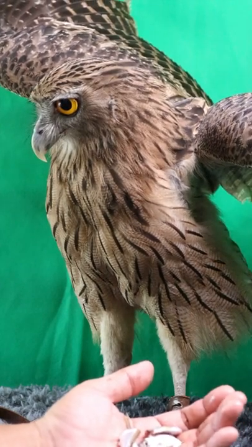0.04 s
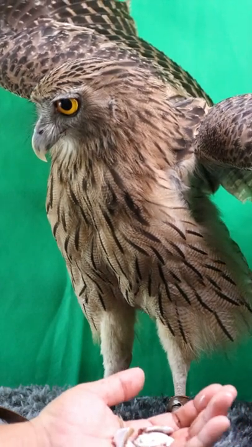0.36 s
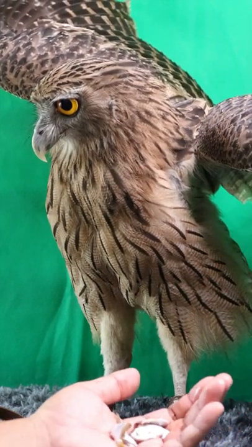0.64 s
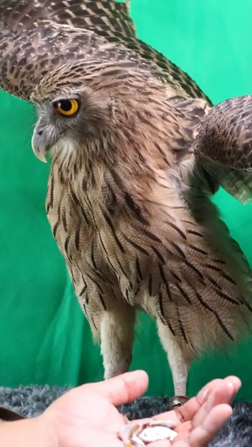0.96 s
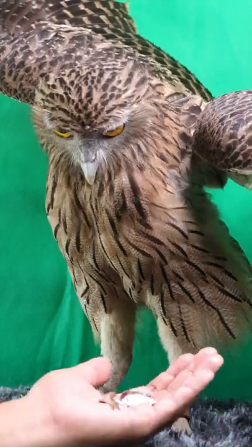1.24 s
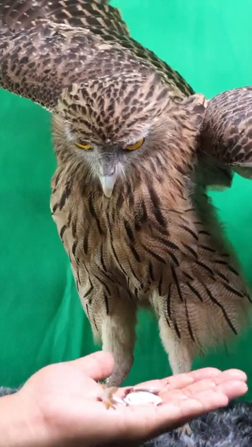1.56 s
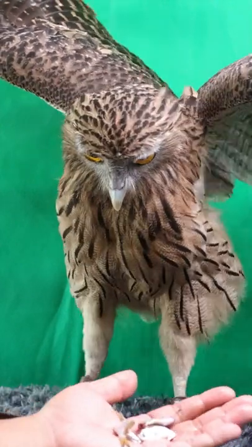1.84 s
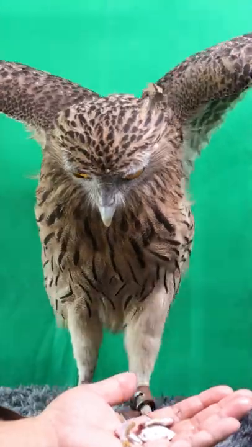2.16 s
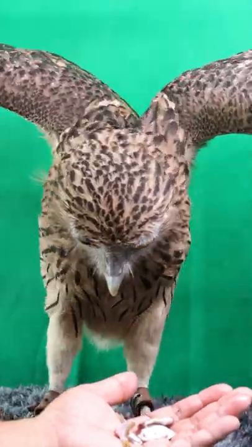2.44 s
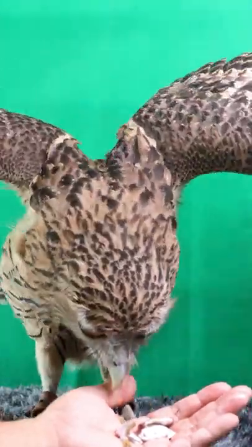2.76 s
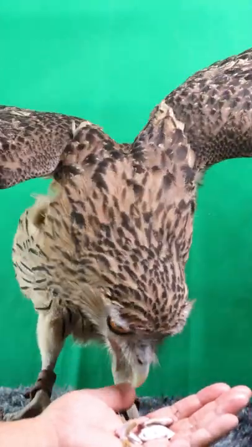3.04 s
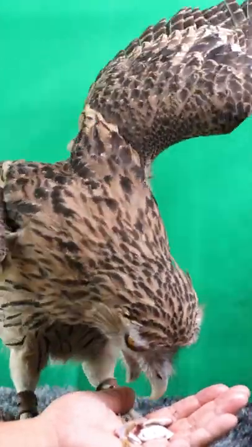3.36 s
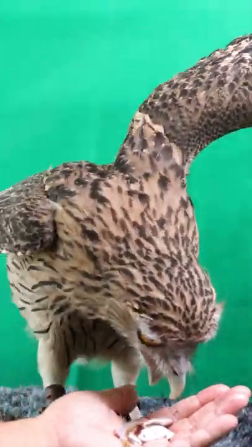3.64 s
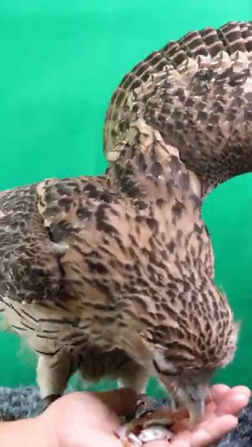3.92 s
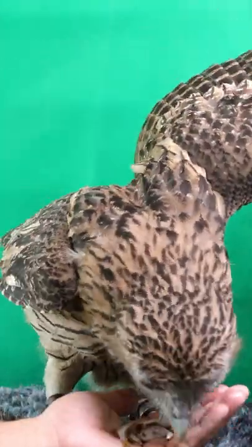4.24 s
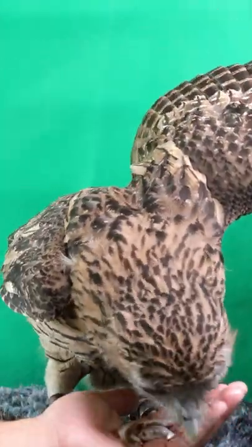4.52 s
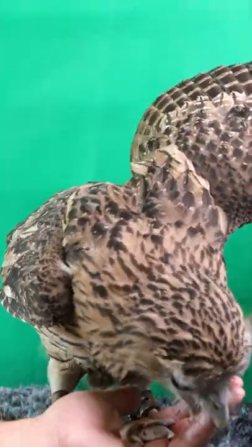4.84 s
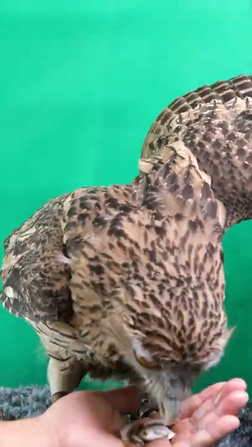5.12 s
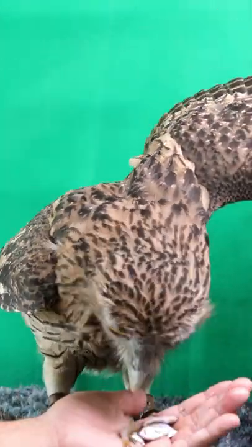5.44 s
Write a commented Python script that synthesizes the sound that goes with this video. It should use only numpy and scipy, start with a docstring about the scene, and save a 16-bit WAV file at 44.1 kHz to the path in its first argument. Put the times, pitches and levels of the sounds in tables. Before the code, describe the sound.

An owl gives three harsh, hissing, whistling screeches indoors, while its wings push thumps and pops of air into a close microphone.

```python
"""Small ticks of food and talons and a rustle of wings sound over a mains hum in a small, fairly live room.
Then an owl begs for food from a hand with three harsh screeches: air forced through the syrinx chirps,
breaks up into a rough whistle and hisses brighter as the beak opens. Its spread wings push air at a
close microphone, which flutters and pops. The loudest moments clip."""
import sys
import numpy as np
from scipy import signal
from scipy.fft import rfft, irfft, next_fast_len
from scipy.io import wavfile
from scipy.ndimage import uniform_filter1d, map_coordinates

SR = 44100
rng = np.random.default_rng(int(sys.argv[2]) if len(sys.argv) > 2 else 0)


def to_wav(s):
    """Save 16-bit WAV."""
    ch = np.atleast_2d(s).T  # columns
    pcm = np.round(np.clip(ch, -1, 1) * 32767)  # PCM
    wavfile.write(sys.argv[1], SR, pcm.astype(np.int16))


N = 250929


def amp(db):
    """Decibels to gain."""
    return 10 ** (np.asarray(db) / 20)


def unit(x):
    """Scale to rms 1."""
    return x / np.sqrt(np.mean(np.abs(x) ** 2) + 1e-20)


def clock():
    """Time of every sample in seconds."""
    return np.arange(N) / SR


def along(points, hz):
    """Interpolate (frequency, value) points on a log axis."""
    f, v = np.transpose(points)
    return np.interp(np.log(hz + 1), np.log(f + 1), v)


def curves(rows):
    """One value per sample for each column after the time."""
    s, *columns = np.transpose(rows)
    return [np.interp(clock(), np.sort(s), column) for column in columns]


def wobble(rate_hz):
    """Smooth random curve of rms 1."""
    knots = rng.standard_normal(int(N * rate_hz / SR) + 4)
    return unit(map_coordinates(knots, [clock() * rate_hz]))


def filtered(x, response):
    """Apply a gain given as a function of frequency."""
    size = next_fast_len(N + SR // 2)
    return irfft(rfft(x, size) * response(np.fft.rfftfreq(size, 1 / SR)), size)[:N]


def noise(spectrum):
    """Coloured noise of rms 1."""
    return unit(filtered(rng.standard_normal(N), lambda hz: amp(along(spectrum, hz))))


def pulse(spectrum, size=4096):
    """Minimum-phase pulse of peak 1."""
    cepstrum = irfft(np.log(amp(along(spectrum, np.fft.rfftfreq(size, 1 / SR)))))
    shape = irfft(np.exp(rfft(2 * cepstrum[:size // 2], size)))
    return shape / np.abs(shape).max()


def add(track, start_s, sound):
    """Mix a sound into the track."""
    part = track[round(start_s * SR):][:len(sound)]
    part += sound[:len(part)]


def swells(rows):
    """Bell-shaped gains from (time [s], level [dB], half length [s]) rows."""
    t = clock()
    return np.sqrt(sum(amp(db) ** 2 * np.exp(-((t - s) / half_s) ** 2) for s, db, half_s in rows))


# (frequency [Hz], level [dB])
AMBIENT_SPECTRUM = [(20, -9), (55, -9), (110, 6), (170, -3.5), (280, -5.5), (450, -11), (700, -14),
                    (1050, -14), (1700, -23), (3500, -29.5), (7000, -34.5), (11000, -37.5), (16000, -44.5)]


def background(hum_hz=50.2, hum_db=-42, ambient_db=-47):
    """Mains hum over the soft rumble and hiss of the room."""
    hum = unit(np.sin(2 * np.pi * hum_hz * clock())) * amp(hum_db + 0.76 * wobble(8.3))
    return hum + amp(ambient_db + wobble(3)) * noise(AMBIENT_SPECTRUM)


# (frequency [Hz], T60 [s])
ROOM_DECAY = [(200, 0.7), (1500, 0.74), (4000, 0.64), (7000, 0.38), (14000, 0.31)]


def room(x):
    """Wall reflections arrive after 5 ms; each frequency decays at its own rate."""
    hz, t, spectra = signal.stft(rng.standard_normal(SR), SR, nperseg=256)
    decay = amp(-60 * t / along(ROOM_DECAY, hz)[:, None])
    tail = signal.istft(spectra * decay, SR, nperseg=256)[1]
    delayed = np.pad(x, (SR // 200, 0))
    return signal.fftconvolve(delayed, tail / np.linalg.norm(tail))[:N]


# (time [s], level [dB], half length [s])
HAND_SCUFFS = [(.483, -44, 0.004), (.53, -51, 0.023), (4.171, -44.5, .004), (4.611, -46.5, .004)]
# (frequency [Hz], level [dB])
SCUFF_SPECTRUM = [(300, -42), (750, 14), (1050, 17.5), (1500, -7.5), (2500, -37), (8000, -47)]


def scuffs():
    """Skin and food rub dully."""
    return swells(HAND_SCUFFS) * noise(SCUFF_SPECTRUM)


# (time [s], relative level [dB])
DRY_TICKS = [(0.0456, -25.5), (0.246, -34.5), (0.426, -33), (0.6399, -28.5), (0.6612, -35.5), (1.0679, -29),
             (1.2413, -37), (4.2334, -31)]
# (frequency [Hz], level [dB])
TICK_SPECTRUM = [(500, -0.5), (1800, -6), (3600, -3), (6500, -12.5), (10000, -28.5), (16000, -32)]


def ticks(t60_s=0.0092, gain_db=-6, faint_count=60, crumb_count=3, cluster_s=0.067, loss_db=7):
    """Talons and food crack in small clusters; shifting feathers add fainter ticks."""
    envelope, t = np.zeros(N), np.arange(SR // 20) / SR
    faint = [(u * N / SR, -54 + 10 * v) for u, v in rng.random((faint_count, 2))]
    crumbs = [(s + cluster_s * u, db - loss_db * k)
              for s, db in DRY_TICKS for k, u in enumerate(rng.random(crumb_count), 1)]
    for s, db in list(DRY_TICKS) + crumbs + faint:
        add(envelope, s, amp(db + gain_db - 60 * t / t60_s))
    return envelope * noise(TICK_SPECTRUM)


# (time [s], half length [s], rustle level [dB], draught level [dB])
BODY_SHIFTS = [(0.04, 0.1, -58, -50.5), (.43, .035, -57.5, -55), (.69, 0.029, -58.5, -54),
               (1.311, 0.037, -39.5, -35), (1.905, 0.018, -50.5, -27), (2.404, .025, -63.5, -31),
               (2.75, .085, -54, -36.5), (3.005, .03, -56, -35), (3.41, 0.051, -54.5, -26.5),
               (4.403, 0.018, -65, -37), (4.643, 0.053, -54.5, -58.5), (4.83, .03, -55, -48),
               (5.22, 0.023, -47, -52)]
# (frequency [Hz], level [dB])
RUSTLE_SPECTRUM = [(500, -13.5), (1100, 3.5), (2400, -10.5), (3600, 0.5), (4600, -8.5), (5800, -9),
                   (8500, -15), (12000, -21.5), (15500, -20)]
DRAUGHT_SPECTRUM = [(30, -6), (110, 1.5), (240, 1.5), (430, -1.5), (650, -11), (1000, -22.5), (2500, -56),
                    (6000, -84)]


def body_shifts(grain_db=3):
    """The body shifts: feather vanes slide in a grainy rustle and stir a draught. Returns both."""
    rustle_gain = swells([(s, db, half_s) for s, half_s, db, _ in BODY_SHIFTS])
    draught_gain = swells([(s, db, half_s) for s, half_s, _, db in BODY_SHIFTS])
    rustle = rustle_gain * noise(RUSTLE_SPECTRUM) * unit(amp(grain_db * wobble(500)))
    return rustle, draught_gain * noise(DRAUGHT_SPECTRUM)


def air_push(hz, rise_cycles=0.45):
    """A slow push of air on the microphone: a heavily damped pressure swing."""
    t = np.arange(SR // 5) / SR
    rise = t * hz / rise_cycles
    return -rise * np.exp(1 - rise) * np.sin(2 * np.pi * hz * t)


# (time [s], push level [dB], push frequency [Hz], flutter level [dB])
WING_BEATS = [(0.104, -24.5, 52.3, -45), (1.844, -15, 63.56, -33), (2.166, -14, 43.2, -28.5),
              (3.449, -6.5, 65, -26), (3.877, -4, 87.7, -20), (5.114, -29, 119, -51)]
# (frequency [Hz], level [dB])
FLUTTER_SPECTRUM = [(30, 4), (120, 8), (250, 0), (430, -3.5), (650, -10.5), (1000, -23), (2500, -59),
                    (6000, -89)]


def wing_beats(lead_s=0.02, half_s=0.034):
    """Each beat sends a flutter of draught, then a push of air, at the microphone."""
    pushes = np.zeros(N)
    for s, db, hz, _ in WING_BEATS:
        add(pushes, s, amp(db) * air_push(hz))
    flutter_gain = swells([(s - lead_s, db, half_s) for s, _, _, db in WING_BEATS])
    return pushes + flutter_gain * noise(FLUTTER_SPECTRUM)


# (time [s], peak level [dB], pulse speed [ratio])
AIR_POPS = [(1.9343, 0.1, 1.07), (2.4067, -18, .9), (3.5708, -4.5, 1.05), (4.0509, -7, 0.91),
            (4.2317, -5.5, 1.035), (4.702, -27, 0.86), (4.824, -14.5, 0.86), (5.488, -16, 0.9)]
# (frequency [Hz], level [dB])
POP_SPECTRUM = [(30, -30.5), (90, 5.5), (190, 8.5), (300, 4.5), (420, 6), (540, -2), (680, 0.5), (950, -23),
                (1500, -25), (3000, -52), (8000, -62.5)]


def pops(wake_delay_s=0.013, wake_db=-19.5, wake_hz=49.7):
    """Eddies hit the microphone as sharp pops, each with a slow push in its wake."""
    out, pop = np.zeros(N), pulse(POP_SPECTRUM)
    index = np.arange(len(pop))
    for s, db, speed in AIR_POPS:
        add(out, s, -amp(db) * np.interp(index * speed, index, pop))
        add(out, s + wake_delay_s, amp(db + wake_db) * air_push(wake_hz))
    return out


def resonance(hz, width_hz, stretch):
    """Turbulence in a steep-sided resonance centred on hz * stretch; power grows with width."""
    band = filtered(rng.standard_normal(N), lambda f: np.hypot(1, (f - hz) / width_hz) ** -3)
    analytic = signal.hilbert(band, next_fast_len(N))[:N]
    drift = np.exp(2j * np.pi * hz * np.cumsum(stretch - 1) / SR)
    return unit((analytic * drift).real) * np.sqrt(width_hz)


def thin_whistle(time_s=3.77, level_db=-20, half_s=0.061, hz=4410, width_hz=60, waver=0.011):
    """A thinner, higher whistle swells out of the hiss late in the second screech."""
    stretch = 1 + waver * wobble(25)
    return swells([(time_s, level_db, half_s)]) * unit(resonance(hz, width_hz, stretch))


def throat_bands(throat, stretch):
    """Turbulence in the throat and beak, grouped into low, core, edge and sizzle bands."""
    return [sum(amp(db) * resonance(hz, width_hz, stretch)
                for hz, width_hz, db in throat if low_hz < hz <= high_hz)
            for low_hz, high_hz in ((0, 2600), (2600, 3200), (3200, 5400), (5400, SR))]


def syrinx(hz, rough, octave_db, jitter=0.006, smear_hz=420, flutter_db=-0.5, upper_db=-58,
           blur_rad=0.3, swing_limit=1.1):
    """The membrane's tone wavers and, with roughness, dissolves into narrow-band noise."""
    rough = np.clip(rough, 0, 1)
    jittered_hz = hz * (1 + jitter * (0.5 + 2 * rough) * wobble(260))
    phase = 2 * np.pi * np.cumsum(jittered_hz) / SR
    chaos = unit(wobble(smear_hz) + 1j * wobble(smear_hz))
    steady = unit(amp(flutter_db * wobble(150)))
    tone = (np.sqrt(1 - rough) * steady + np.sqrt(rough) * chaos) * np.exp(1j * phase)
    tone /= np.hypot(1, np.abs(tone) / swing_limit)
    # uneven cycles blur the overtones more than the fundamental
    turn = np.exp(1j * (np.angle(tone) + blur_rad * wobble(340)))
    harmonics = 1 + amp(octave_db) * turn + amp(upper_db) * (turn ** 2 + turn ** 3)
    return unit((tone * harmonics).real)


LOW_REGISTER_RATIO, DROP_BACK_S = 0.74, 0.024
PITCH_SCOOP, PITCH_SCOOP_S = 0.16, 0.005
PITCH_SAG, PITCH_SAG_S = 0.25, 0.018
THROAT_SCOOP, THROAT_SCOOP_S = 0.3, 0.009
SHUT_SIZZLE_DB, SHUT_EDGE_DB, SHUT_VOICE_DB = -36, -13.5, -2


def screech(call, contour, throat, waver=0.004, rasp_db=0.87, rise_s=0.0063, fall_s=0.0077):
    """A low chirp breaks upward into a whistle; the hiss brightens as the beak opens."""
    (start_s, end_s, chirp_s, chirp_db, hiss_start_db, hiss_end_db, open_db,
     open_s, close_s, octave_db, climb_per_s, edge_db_per_s) = call
    held_hz, whistle_db, rough = curves(contour)
    t = clock()
    age_s = np.clip(t - start_s, 0, end_s - start_s)
    left_s = np.clip(end_s - t, 0, end_s - start_s)
    from_middle_s = (age_s - left_s) / 2
    closing = np.exp(-left_s / close_s)
    sizzle_db = open_db + SHUT_SIZZLE_DB * (np.exp(-age_s / open_s) + closing)

    # the throat snaps open, scooping the resonances up into place
    stretch = 1 + climb_per_s * from_middle_s - THROAT_SCOOP * np.exp(-age_s / THROAT_SCOOP_S)
    low, core, edge, sizzle = throat_bands(throat, stretch)
    edge_gain = amp(edge_db_per_s * from_middle_s + SHUT_EDGE_DB * closing)
    hiss_gain = amp(np.interp(t, (start_s, end_s), (hiss_start_db, hiss_end_db)))
    hiss = hiss_gain * (low + core + edge_gain * edge) / np.std(low)
    hiss += amp(sizzle_db - 2.5) * unit(sizzle)
    # low register at both ends: most of the air goes into the tone
    in_low = uniform_filter1d(1.0 * ((age_s < chirp_s) | (left_s < DROP_BACK_S)), size=96)
    hiss *= (1 - 0.67 * in_low) * unit(amp(rasp_db * wobble(300)))

    scoop = PITCH_SCOOP * np.exp(-age_s / PITCH_SCOOP_S)
    sag = PITCH_SAG * np.exp(-left_s / PITCH_SAG_S)  # the air runs out
    hz = held_hz * LOW_REGISTER_RATIO ** in_low * (1 + waver * wobble(22) - scoop - sag)
    # the open beak lets out the octave along with the sizzle
    overtone_db = np.minimum(octave_db + sizzle_db - whistle_db, -10)
    tone_gain = in_low * amp(chirp_db) + (1 - in_low) * amp(whistle_db)
    tone = tone_gain * syrinx(hz, rough, overtone_db)

    attack = np.clip((t - start_s) / rise_s + 0.5, 0, 1)
    release = np.clip((end_s - t) / fall_s + 1, 0, 1)
    return attack * release * amp(SHUT_VOICE_DB * closing) * (tone + hiss)


# (start [s], end [s], chirp length [s], chirp level [dB], start hiss [dB], end hiss [dB],
#  relative open-beak sizzle [dB], beak opening [s], beak closing [s], octave offset from sizzle [dB],
#  resonance climb [1/s], edge band growth [dB/s])
BEGGING_CALLS = [(1.258, 2.19, .023, -32.5, -37, -25.5, -23, 0.39, 0.0076, -.5, .09, 6),
                 (3.131, 3.955, .012, -24, -23.5, -19.5, -31.5, .06, 0.04, -22.5, .03, 2),
                 (5.174, 5.8, .017, -27, -31.5, -32.5, -27.5, 0.18, .02, -6, .12, 7)]
# held whistle: (time [s], pitch [Hz], level [dB], roughness [0-1])
CONTOUR_1 = [(1.29, 2830, -34, 0.1), (1.506, 2905, -20, 0.2), (1.828, 2992, -15.5, 0.16),
             (1.868, 3046, -11, 0.14), (2.092, 3137, -13.5, 0.2), (2.132, 3160, -10.5, 0.2),
             (2.15, 3058, -18.5, 0.1)]
CONTOUR_2 = [(3.144, 2955, -10.5, 0.34), (3.16, 3185, -7, .5), (3.2, 3305, -9.5, .5), (3.3, 3239, -8, .8),
             (3.368, 3475, -5, 0.67), (3.425, 3497, -18, .55), (3.575, 3497, -11, .55),
             (3.614, 3500, -20, .55), (3.9, 3400, -32.5, .9)]
CONTOUR_3 = [(5.189, 2657, -18, .4), (5.21, 2901, -19.5, .6), (5.29, 3090, -18.5, 0.65),
             (5.399, 3045, -21.5, .8), (5.489, 3030, -21, 0.3), (5.68, 3025, -34, .45)]
# throat and beak: (centre [Hz], width [Hz], relative level [dB])
RESONANCES_1 = [(1024, 260, -3.5), (1433, 170, -2), (1943, 110, 3), (2345, 550, 0), (3070, 400, 3),
                (3720, 370, 2), (4856, 190, 1.5), (5900, 460, 2.5), (6700, 840, -15), (9000, 600, -31),
                (10000, 600, -31), (11300, 900, -32), (14000, 2000, -45)]
RESONANCES_2 = [(1430, 465, -16.5), (2105, 210, -5), (2445, 320, 1), (2902, 450, 4.5), (3600, 340, 4),
                (4244, 370, 1), (5706, 600, 5.5), (7400, 1900, -17.5), (11300, 1100, -22.5),
                (12660, 780, -23.5), (14450, 900, -25)]
RESONANCES_3 = [(916, 260, -8), (1600, 240, 2.5), (2091, 410, 4.5), (2750, 380, 3.5), (3390, 370, 14.5),
                (4210, 750, -3), (6020, 530, 1.5), (7260, 540, -19.5), (10100, 750, -34), (12000, 500, -33)]


def owl():
    """Three begging screeches, each with its own whistle contour and throat shape."""
    contours = (CONTOUR_1, CONTOUR_2, CONTOUR_3)
    throats = (RESONANCES_1, RESONANCES_2, RESONANCES_3)
    return sum(map(screech, BEGGING_CALLS, contours, throats)) + thin_whistle()


def scene(wet_db=-16):
    """The bird sounds in the room; the air it moves acts only on the microphone."""
    rustle, draught = body_shifts()
    bird = scuffs() + ticks() + rustle + owl()
    moving_air = draught + wing_beats() + pops()
    return (background() + amp(wet_db) * room(bird) + moving_air + bird)[None]


def record(dry, clip_level=0.99, top_hz=15900):
    """Clip near full scale, then band-limit."""
    clipped = np.clip(dry[0], -clip_level, clip_level)
    return filtered(clipped, lambda hz: hz < top_hz)[None]


dry = scene()
out = record(dry)
to_wav(out)
```